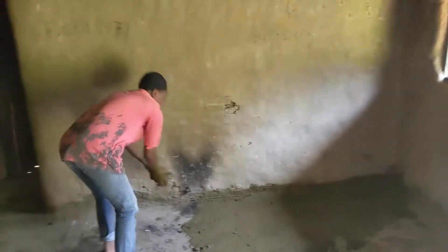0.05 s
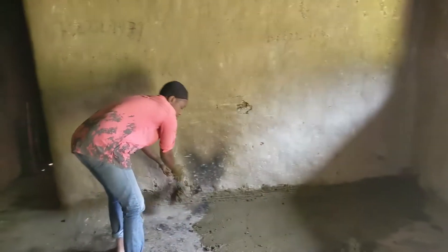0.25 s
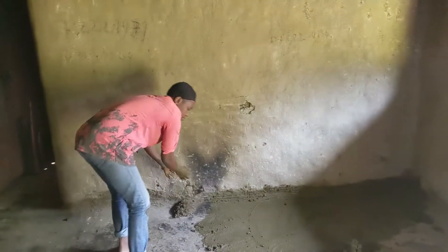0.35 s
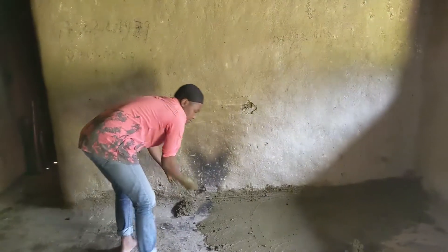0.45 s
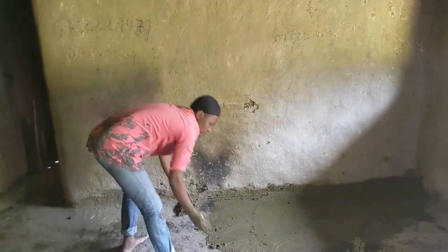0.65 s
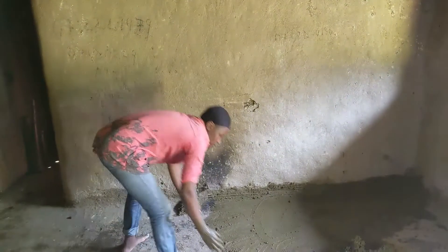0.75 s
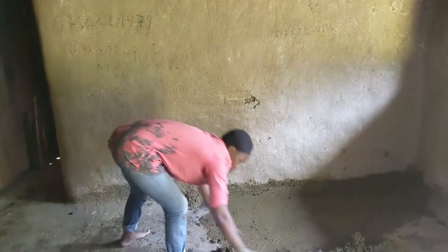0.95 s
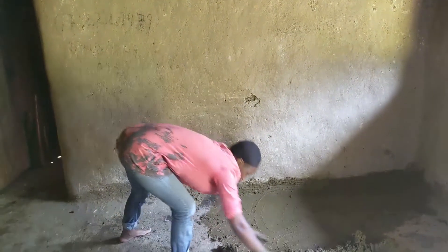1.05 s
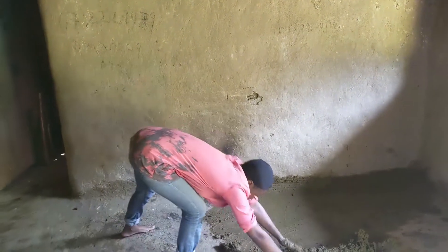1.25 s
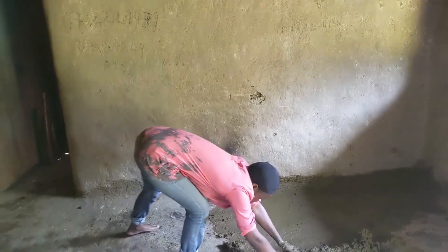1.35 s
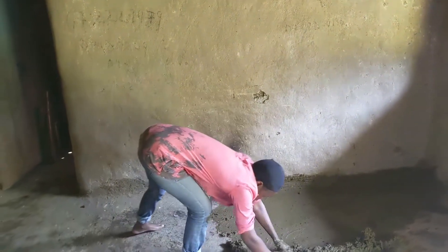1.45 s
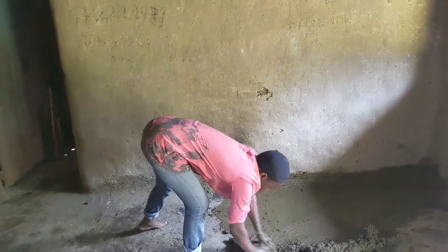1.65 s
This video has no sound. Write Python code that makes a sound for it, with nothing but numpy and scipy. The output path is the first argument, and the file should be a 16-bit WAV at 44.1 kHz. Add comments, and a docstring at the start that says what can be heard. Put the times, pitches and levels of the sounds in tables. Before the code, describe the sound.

Wet muddy paste lands with a single slap, slightly to the right, echoing briefly in a bare room. Soft bumps on the hand-held microphone follow, then faint gritty hand smearing with tiny wet pops over low hiss.

```python
"""Wet dung plaster rustles briefly in the hands, then hits the floor of a small bare room with one ringing slap.
Its clots burst in quick succession and set the room's modes ringing. Crumbs patter after it; then a palm
smears the paste in long gritty strokes, grit and fibres slipping under it and wet pockets popping.
The work is on the floor to the right of a hand-held microphone, which rumbles and knocks softly
over faint hiss and a distant drone."""
import sys
import numpy as np
from scipy import signal
from scipy.fft import rfft, irfft, next_fast_len
from scipy.io import wavfile

SR = 44100
rng = np.random.default_rng(int(sys.argv[2]) if len(sys.argv) > 2 else 0)


def wav_record(signal):
    """Record a signal, one row per channel, as 16-bit PCM in the file named by sys.argv[1]."""
    frames = np.transpose(np.atleast_2d(signal))
    bounded = np.clip(frames, -1, 1)
    # unit amplitude maps onto the largest positive 16-bit level
    quanta = np.round(bounded * 32767).astype(np.int16)
    wavfile.write(sys.argv[1], SR, quanta)


N = 74970
TIME = np.arange(N) / SR
HZ = np.arange(N // 2 + 1) * SR / N

# likeness of left and right in diffuse sound (frequency [Hz], correlation [-1 to 1])
DIFFUSE_CORRELATION = [(30, 0.69), (70, 0.81), (140, 0.65), (300, 0.038), (520, -0.73), (850, -0.039),
                       (1350, 0.47), (1900, 0.18), (2600, -0.052), (15000, 0.13)]
# reverberation of the bare room (frequency [Hz], time to fall 60 dB [s])
ROOM_T60 = [(100, 0.64), (250, 0.67), (500, 0.58), (1000, 0.48), (2000, 0.29), (4000, .35), (8000, 0.3),
            (14000, 0.18)]
# direct sound on the left, relative to the right (frequency [Hz], gain [dB])
LEFT_SHADOW = [(150, -2), (400, 0), (700, -11.5), (1400, -7), (2500, -11), (4500, -4), (8000, -19.5)]
# colour of the microphone (frequency [Hz], gain [dB])
MIC_RESPONSE = [(2300, 1), (2850, -0.5), (3400, 0), (4000, -0.5), (4800, -8), (5600, -1), (6500, -7.5),
                (7600, 0.5), (8700, -4), (9700, 0), (10600, -6), (12600, -2.5), (14000, -7.5)]
# mismatch of its two ports (frequency [Hz], left over right [dB])
MIC_BALANCE = [(60, 1.5), (300, 1), (700, -3), (1300, 0.5), (2500, -1), (3600, -2), (4700, -12),
               (6000, -13), (7600, -3.5), (10000, 1.5), (15000, 3.5)]

# spectrum of the steady room tone (frequency [Hz], relative level [dB])
ROOM_TONE_SPECTRUM = [(40, -5), (120, -20), (230, -17), (460, -6), (650, -7), (1050, -21.5), (2000, -20),
                      (3400, -19.5), (6000, -18), (9500, -24), (11000, -25.5), (15500, -24)]
# its lean, leftward in the mid treble (frequency [Hz], right over left [dB])
ROOM_TONE_PAN = [(1000, -0.5), (3500, 1), (4700, -9), (6000, -15), (7600, -4.5), (11000, 1)]
# spectrum of the distant drone (frequency [Hz], relative level [dB])
DRONE_SPECTRUM = [(200, -23.5), (350, -23.5), (470, 3.5), (620, 1.5), (800, -8.5), (1100, -22),
                  (3000, -60.5)]
# faint narrow hisses (start [s], attack [s], hold [s], release [s], level [dB], centre [Hz])
HISSES = [(0.573, .04, 0.22, 0.07, -72, 3500), (.83, .06, 0.1, 0.07, -73, 5360)]

# course of the handling rumble (time [s], level [dB])
RUMBLE_LEVEL = [(0, -54.5), (.09, -48), (.2, -61.5), (.53, -61.5), (.56, -56.5), (.74, -61), (.8, -48.5),
                (.89, -36), (.99, -45.5), (1.08, -52), (1.15, -43), (1.22, -46), (1.32, -56), (1.4, -45.5),
                (1.5, -54), (1.62, -60.5), (1.7, -71)]
# spectrum of the rumble (frequency [Hz], relative level [dB])
RUMBLE_SPECTRUM = [(12, -7), (28, 3), (50, -3), (80, -4.5), (115, -19), (200, -29), (350, -52.5),
                   (1000, -61.5)]
# soft knocks on the microphone body (time [s], level [dB], pitch [Hz])
MIC_KNOCKS = [(0.086, -51, 80), (0.774, -37, 103), (.808, -31, 62), (.866, -32.5, 92), (0.895, -29, 55),
              (0.942, -42, 125), (1.027, -40, 93), (1.151, -30, 59), (1.37, -37, 68.6), (1.386, -41, 206),
              (1.402, -42, 82)]

# crumbs landing and wet pockets popping (time [s], drive level [dB], centre [Hz], room send [dB])
POPS = [(.031, -51, 10900, 10), (.522, -44, 2380, 0.5), (0.53, -44, 1300, -5), (.647, -46.5, 2465, 4.5),
        (1.002, -44.5, 9100, -12), (1.098, -46.5, 3470, -3), (1.1718, -39.5, 1870, -1.5),
        (1.178, -32, 6500, 0), (1.2428, -42, 5000, -4), (1.2489, -48, 5500, -4), (1.2824, -34, 3100, 1.5),
        (1.432, -47.5, 6000, 10), (1.536, -46, 6000, -21), (1.685, -55.5, 2930, 10)]
# rubbing: paste worked in the hands, a rustle while bending, then smearing on the floor
# (start [s], attack [s], hold [s], release [s], level [dB], treble tilt [dB/octave])
STROKES = [(-.03, 0.022, 0.032, 0.1, -50.5, 2), (0.205, 0.019, 0.0077, .01, -59, -3),
           (0.76, 0.066, 0.017, 0.032, -59, -2.9), (1.077, 0.018, 0.024, 0.14, -62.5, 0.5),
           (1.171, .006, 0.042, 0.067, -58.5, 1.5), (1.217, 0.025, 0.014, 0.023, -52.5, -1.5),
           (1.279, 0.0021, 0.0098, 0.012, -55.5, -2), (1.28, 0.047, 0.21, 0.052, -54, -0.23),
           (1.5, 0.074, 0.12, .05, -51.5, 2.1), (1.651, 0.026, .03, .02, -59.5, -5.5)]
# spectrum of the rubbing (frequency [Hz], relative level [dB])
SMEAR_SPECTRUM = [(150, -4.5), (500, -6), (1000, -8.5), (1700, -3.5), (3200, 1), (6000, 0), (9500, 2.5),
                  (11000, -3), (15500, 0)]

# clots of the lump hitting the floor (time [s], level [dB], fall [dB/s], treble tilt [dB/octave])
CLOTS = [(0.2409, -27, 2198, -1), (0.243, -20, 2800, 0), (0.2471, -26.5, 1498, 0.5),
         (0.2501, -33, 1304, -1.5), (0.2573, -27, 1102, 0.65), (0.266, -40.5, 503, 2)]
# spectrum of a bursting clot (frequency [Hz], relative level [dB])
SPLAT_SPECTRUM = [(40, -20), (80, -12.5), (135, -5.5), (200, -7.5), (300, -8.5), (450, 0), (590, -6),
                  (700, -12.5), (850, -13.5), (990, -11), (1150, -13), (1380, -14), (1550, -13),
                  (1850, -8.5), (2300, -8.5), (2700, -12), (3400, -8.5), (4500, -16), (8000, -14),
                  (11000, -22.5), (15500, -20)]
# room modes rung by the slap (frequency [Hz], level [dB], time to fall 60 dB [s])
ROOM_MODES = [(133.96, -34, 0.29), (230, -43, 0.6), (263.3, -41, 0.44), (355.8, -38.5, 0.43),
              (408.7, -40.5, 0.51), (488.6, -39.5, 0.66), (591, -35, 0.25), (794, -44, 0.34),
              (1000, -41, 0.19), (1396, -47, 0.5), (1825, -43, 0.27), (1952, -53, .3), (2320, -65, 0.11),
              (3417, -44.5, 0.39)]


def from_db(db):
    """Decibels to gain."""
    return 10 ** (np.asarray(db) / 20)


def unit_power(x):
    """Scale to an RMS of one."""
    return x / np.sqrt(np.mean(x ** 2) + 1e-20)


def at_hz(points, hz):
    """Read a table on a log-frequency axis."""
    freqs, values = np.transpose(points)
    return np.interp(np.log(np.maximum(hz, 1)), np.log(freqs), values)


def pan(db):
    """Left and right gains, the right louder by db."""
    return from_db(np.array([[-1], [1]]) * db / 2)


def convolve(x, response):
    """Pass each channel through an impulse response."""
    return signal.fftconvolve(np.atleast_2d(x), np.atleast_2d(response), axes=1)[:, :N]


def colour(x, points, tilt_db=0, keep_power=True, size=8192):
    """Minimum-phase filter with the given spectrum, tilted by tilt_db per octave above 1 kHz."""
    hz = np.arange(size // 2 + 1) * SR / size
    gain = from_db(at_hz(points, hz) + tilt_db * np.log2(np.maximum(hz / 1000, 1)))
    cepstrum = irfft(np.log(unit_power(gain) if keep_power else gain))
    cepstrum[1:size // 2] *= 2  # folding makes the filter causal
    cepstrum[size // 2 + 1:] = 0
    return convolve(x, irfft(np.exp(rfft(cepstrum))))


def drift(hz):
    """Random wander slower than hz, unit power."""
    lowpass = signal.butter(2, hz, fs=SR, output="sos")
    return unit_power(signal.sosfilt(lowpass, rng.standard_normal(N + SR))[SR:])


def grains(per_s, spread_db):
    """Random tiny clicks of uneven size, unit power."""
    sizes = from_db(spread_db * np.minimum(rng.exponential(1, N), 4))
    signs = rng.choice([-1, 1], N)
    return unit_power(sizes * signs * (rng.random(N) < per_s / SR))


def swell(start, attack, hold, release):
    """Envelope that rises, holds and falls."""
    return np.interp(TIME, start + np.cumsum([0, attack, hold, release]), [0, 1, 1, 0])


def burst(start, fall_db_per_s, attack_s=0.0005):
    """Envelope of an impact: a quick rise and a steady fall."""
    age = np.maximum(TIME - start, 0)
    return np.minimum(age / attack_s, 1) * from_db(-fall_db_per_s * age)


def diffuse_noise(size=N):
    """White stereo noise reaching the microphone from all sides."""
    hz = np.arange(size // 2 + 1) * SR / size
    alike = at_hz(DIFFUSE_CORRELATION, hz)
    mid, side = rfft(rng.standard_normal((2, size)))
    return irfft(np.sqrt((1 + alike) / 2) * mid + np.sqrt((1 - alike) / 2) * side * [[1], [-1]], size)


def reflections(x, length_s=0.55):
    """Dense echoes off the bare walls, dying band by band; each call draws a new pattern."""
    size = next_fast_len(int(length_s * SR))
    hz = np.arange(size // 2 + 1) * SR / size
    spectrum = rfft(diffuse_noise(size))
    centres = [centre for centre, _ in ROOM_T60]
    tail = 0
    for share, (_, t60) in zip(np.eye(len(centres)), ROOM_T60):
        band = irfft(spectrum * at_hz(list(zip(centres, share)), hz), size)
        tail += band * from_db(-60 * TIME[:size] / t60)
    return convolve(x, tail / np.sqrt(np.sum(tail ** 2) / 2))


def direct(x, left_lag_s=0.0006):
    """Sound from the right reaches the left channel later and weaker; the bass stays near the centre."""
    x = np.ravel(x)
    lag = left_lag_s * np.interp(HZ, [110, 440], [0, 1])
    left = rfft(x) * from_db(at_hz(LEFT_SHADOW, HZ)) * np.exp(-2j * np.pi * HZ * lag)
    return np.array([irfft(left, N), x])


def background(tone_db=-62.5, drone_db=-65, hiss_q=10.6):
    """Steady room tone and a distant drone, with a thin hiss coming and going."""
    tone = colour(diffuse_noise(), ROOM_TONE_SPECTRUM)
    tone = irfft(rfft(tone) * pan(at_hz(ROOM_TONE_PAN, HZ)), N)
    drone = pan(-15) * direct(colour(rng.standard_normal(N), DRONE_SPECTRUM))
    out = from_db(tone_db) * tone + from_db(drone_db) * drone
    for *shape, db, hz in HISSES:
        hiss = signal.lfilter(*signal.iirpeak(hz, hiss_q, fs=SR), diffuse_noise())
        out += from_db(db) * swell(*shape) * unit_power(hiss)
    return out


def mic_handling(knock_cycles=0.75):
    """The hand on the microphone makes a lumpy rumble and dull knocks of about one cycle."""
    level_db = np.interp(TIME, *np.transpose(RUMBLE_LEVEL))
    out = from_db(level_db) * unit_power(colour(diffuse_noise(), RUMBLE_SPECTRUM))
    for start, db, hz in MIC_KNOCKS:
        cycles = np.maximum(TIME - start, 0) * hz
        rise = 1 - np.exp(-2 * np.pi * cycles)
        fall = np.exp(-(cycles / knock_cycles) ** 2)
        out += from_db(db) * rise * fall * np.sin(2 * np.pi * cycles)
    return out


def crumbs_and_pops(decay_s=0.00078, q=2.4):
    """Each landing crumb or popping pocket gives a millisecond of crackle in one broad resonance."""
    near, room_send = 0, 0
    for start, db, hz, room_db in POPS:
        envelope = (TIME >= start) * np.exp(-np.minimum(np.abs(TIME - start) / decay_s, 20))
        crack = envelope * rng.standard_normal(N)
        pop = 2 * from_db(db) * signal.lfilter(*signal.iirpeak(hz, q, fs=SR), crack)
        near += pop
        room_send += from_db(room_db) * pop
    return direct(near) + reflections(room_send)


def smearing(judder_db=1.5, judder_hz=29, room_db=-1.5):
    """Grit and wet fibres slip under a slightly juddering hand; each stroke has its own reflections."""
    slips = grains(per_s=4000, spread_db=3) * from_db(judder_db * drift(judder_hz))
    out = 0
    for *shape, db, tilt_db in STROKES:
        stroke = colour(from_db(db) * swell(*shape) * slips, SMEAR_SPECTRUM, tilt_db)
        out += direct(stroke) + from_db(room_db) * reflections(stroke)
    return out


def slap(pan_db=2):
    """Each clot bursts on its own spot of floor, with its own reflections; the room's modes ring on."""
    spatter = grains(per_s=9000, spread_db=1.5)
    splats, ringing = 0, 0
    for start, db, fall_db_per_s, tilt_db in CLOTS:
        splat = colour(from_db(db) * burst(start, fall_db_per_s) * spatter, SPLAT_SPECTRUM, tilt_db)
        splats += direct(splat) + reflections(splat)
    loudest_clot_s = CLOTS[1][0]
    for hz, db, t60 in ROOM_MODES:
        mode = np.sin(2 * np.pi * (hz * TIME + rng.random()))
        ringing += from_db(db) * burst(loudest_clot_s, 60 / t60) * mode
    return pan(pan_db) * (splats + direct(ringing))


def scene():
    """The room as heard from the microphone's position, in stereo."""
    return slap() + smearing() + crumbs_and_pops() + mic_handling() + background()


def record(dry, ceiling=0.57, cutoff_hz=15700):
    """Each microphone port adds its own colour; the highest peaks are rounded and the top is cut."""
    tinted = colour(dry, MIC_RESPONSE, keep_power=False)
    ports = []
    for channel, sign in zip(tinted, (1, -1)):
        port_response = [(hz, sign * db / 2) for hz, db in MIC_BALANCE]
        ports.append(colour(channel, port_response, keep_power=False))
    rounded = ceiling * np.tanh(np.vstack(ports) / ceiling)
    lowpass = signal.ellip(12, 0.1, 80, cutoff_hz, fs=SR, output="sos")
    return signal.sosfilt(lowpass, rounded)


dry = scene()
out = record(dry)
wav_record(out)
```